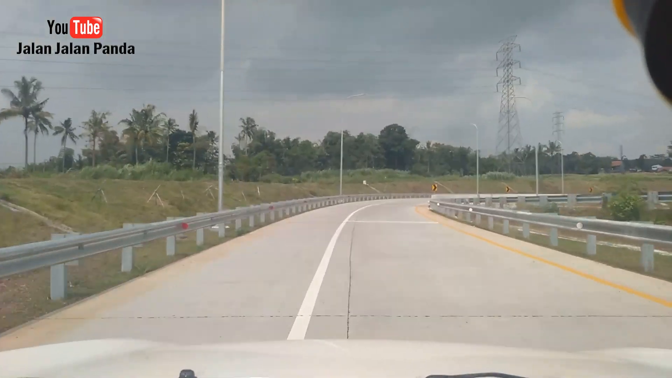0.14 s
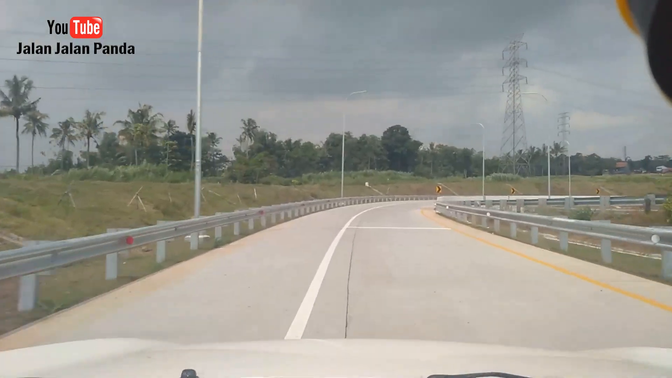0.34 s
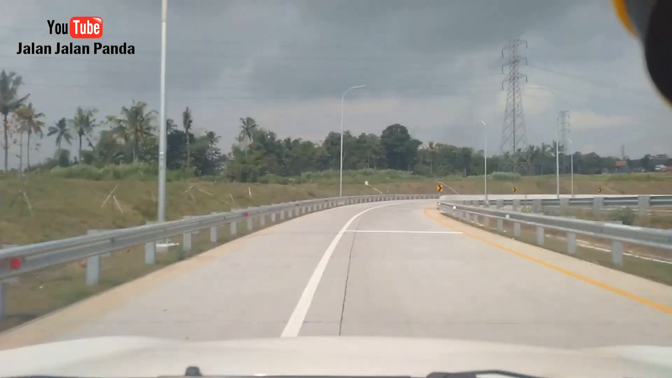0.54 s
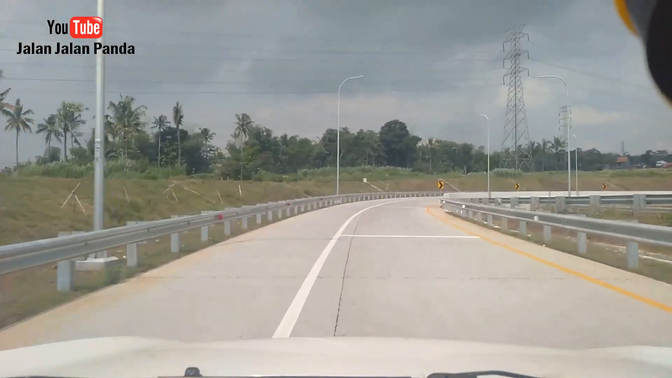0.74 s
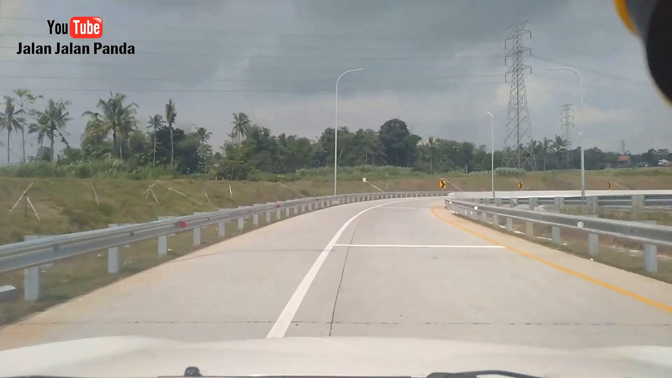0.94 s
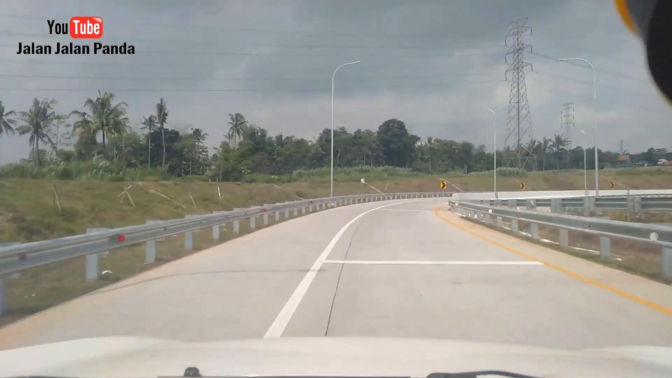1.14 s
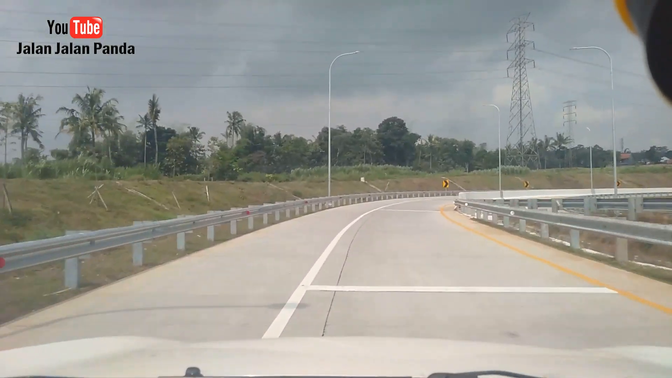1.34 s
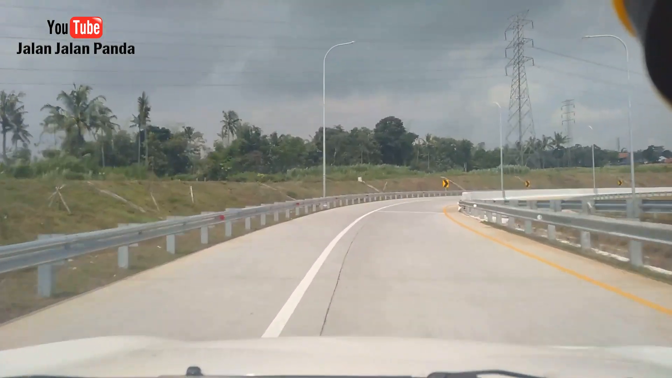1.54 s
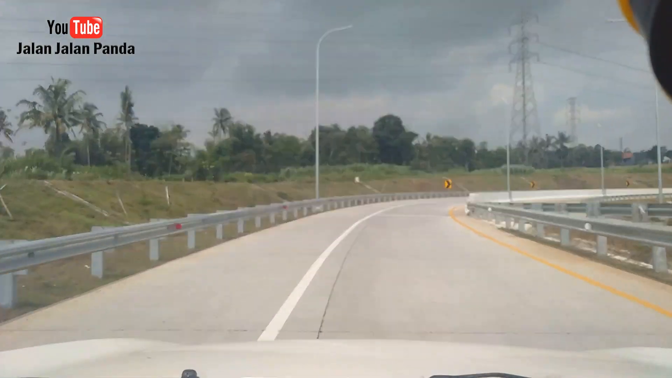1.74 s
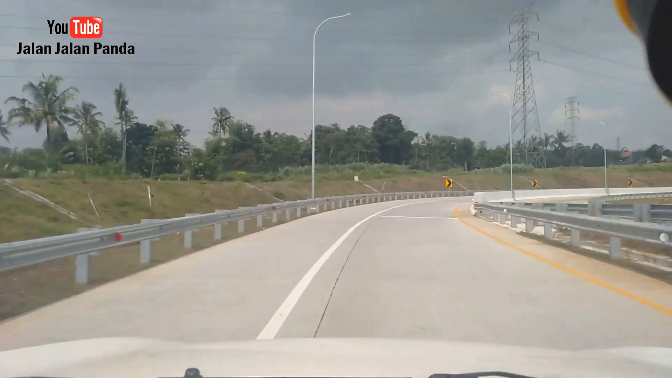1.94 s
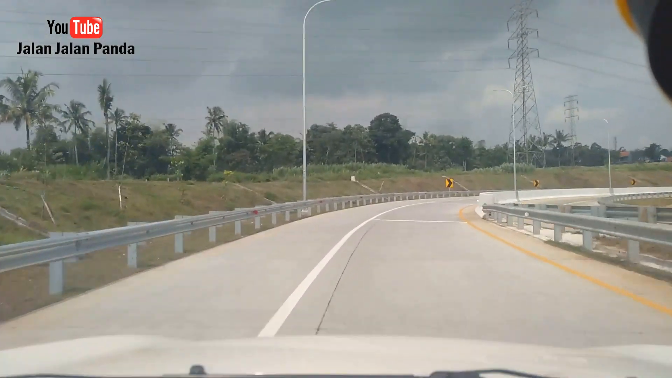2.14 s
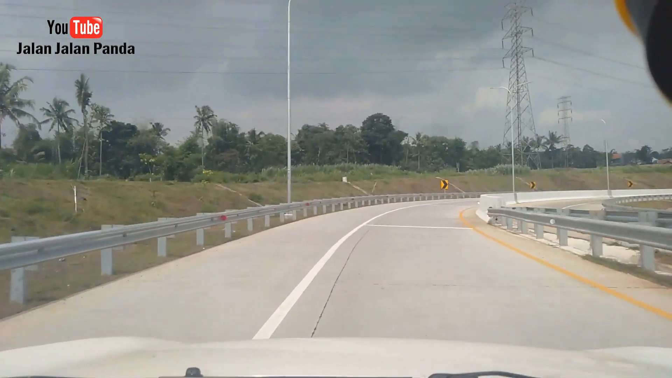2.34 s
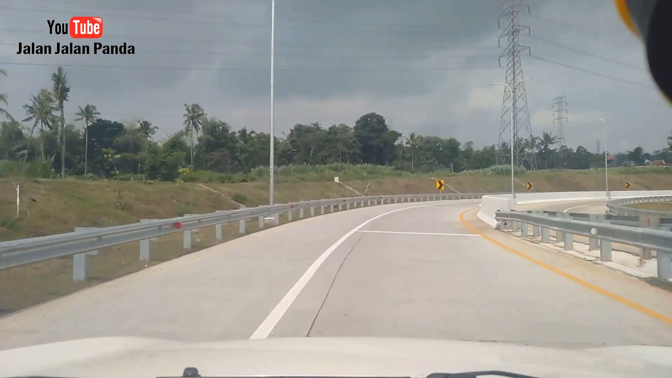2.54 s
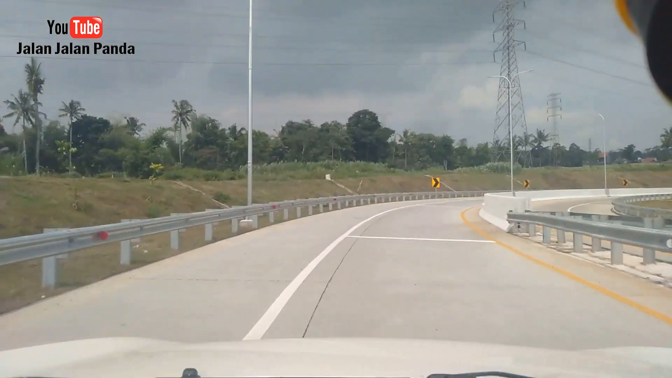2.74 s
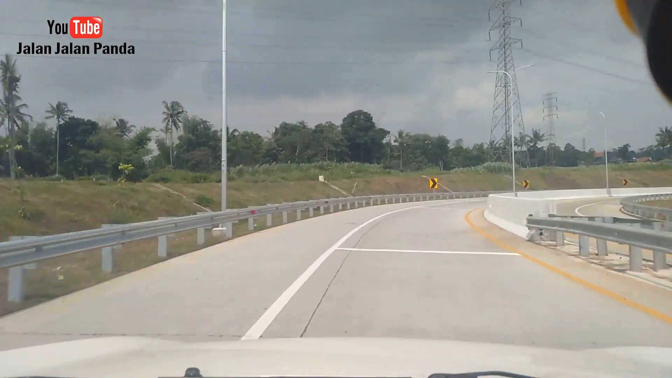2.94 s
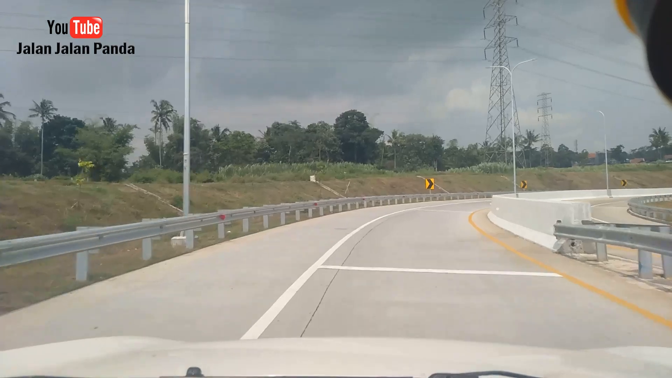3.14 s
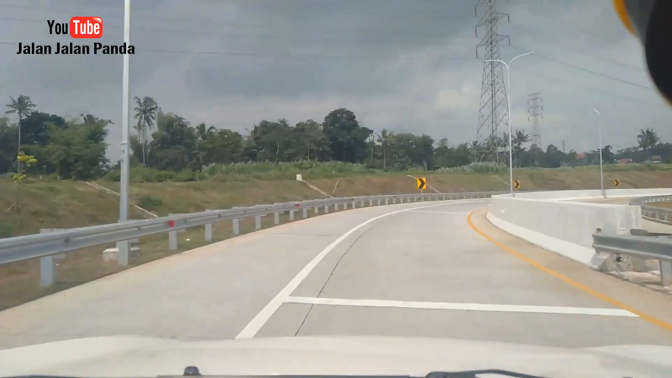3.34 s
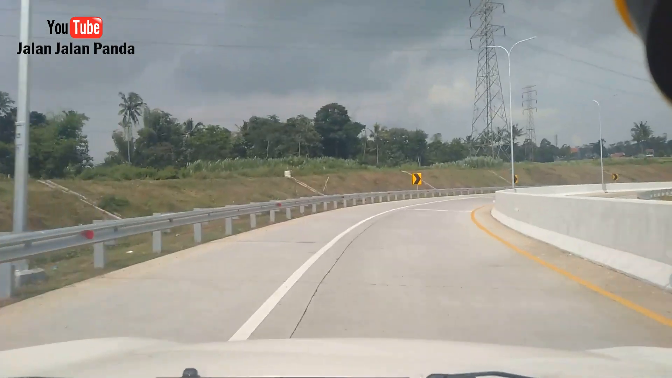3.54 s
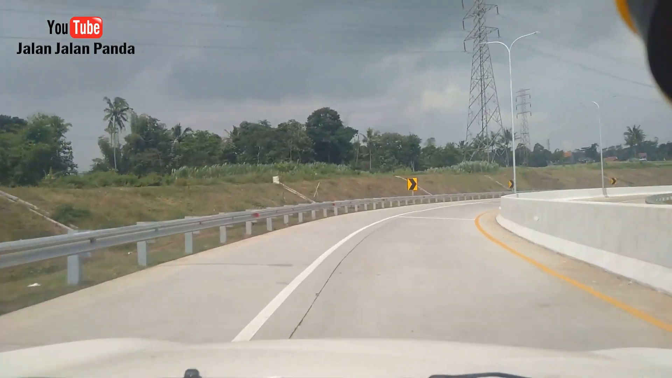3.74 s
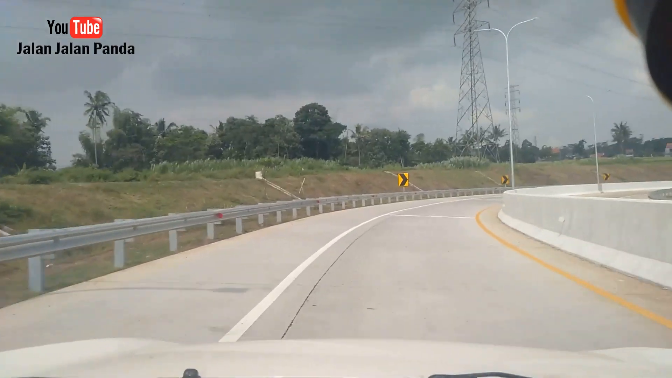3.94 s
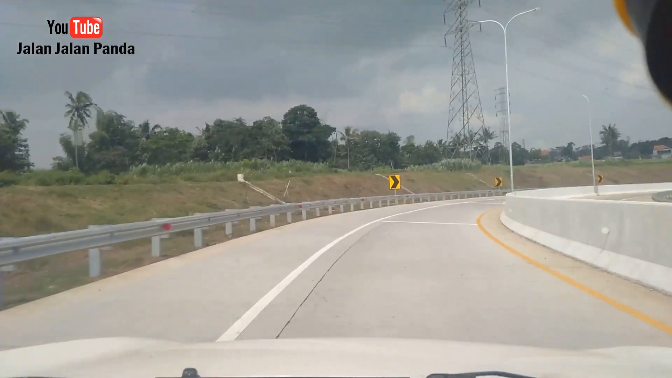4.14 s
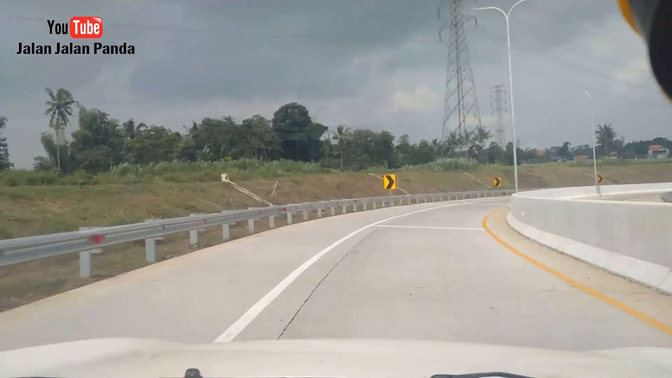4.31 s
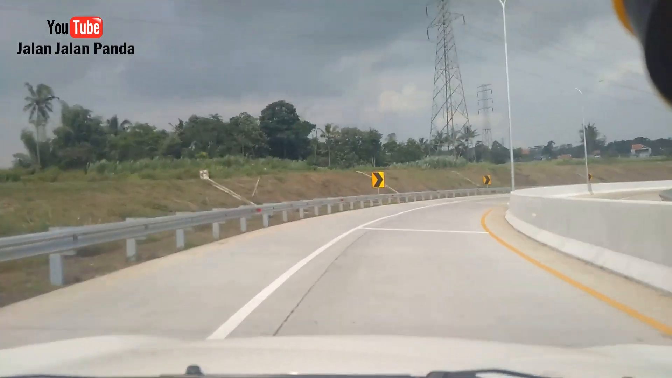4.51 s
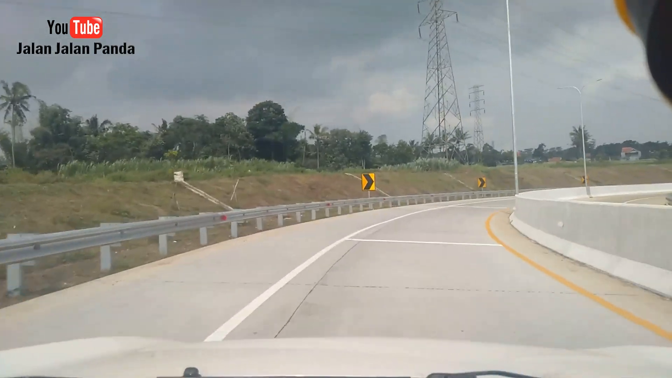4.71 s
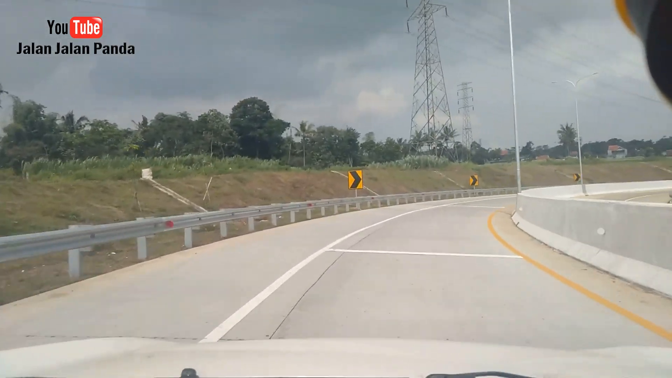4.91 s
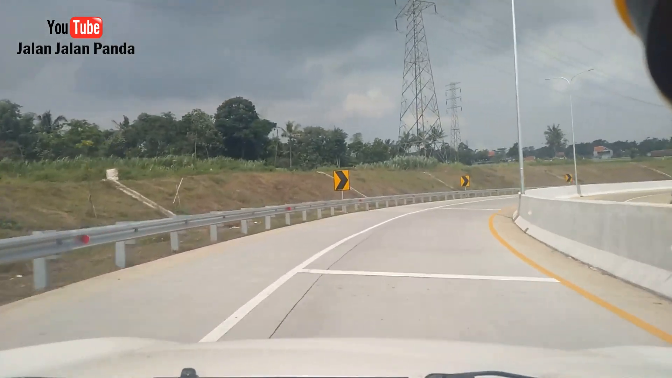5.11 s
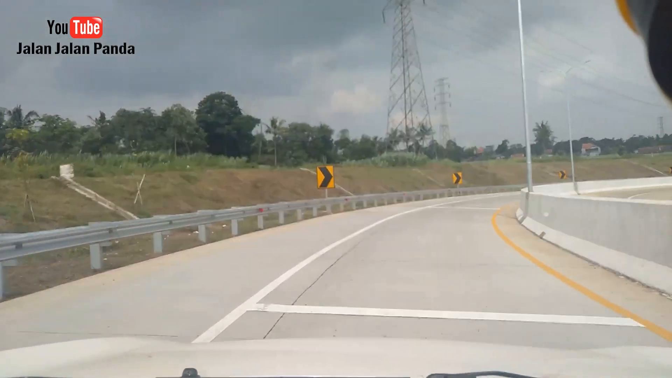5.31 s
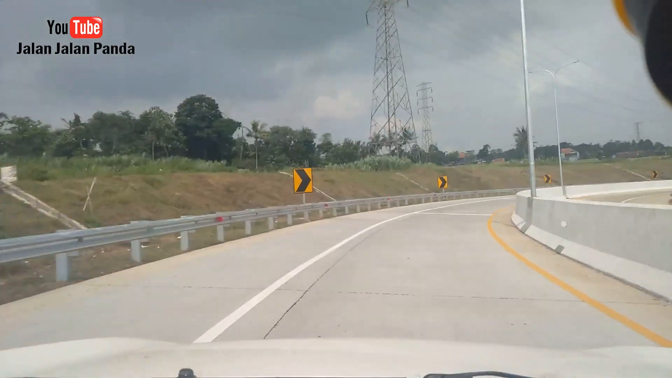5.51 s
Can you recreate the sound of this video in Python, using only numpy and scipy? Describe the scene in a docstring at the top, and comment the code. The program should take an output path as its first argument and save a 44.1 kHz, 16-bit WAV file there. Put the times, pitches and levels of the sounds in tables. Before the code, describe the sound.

Inside a moving car, steady low tyre rumble on concrete, broken about every two seconds by a double thump, slap and plastic rattle.

```python
"""Car on a concrete ramp

Cabin sound: tyre noise is filtered noise plus resonances, the engine a sine, the tread four beating sines.
About every two seconds a raised painted strip excites damped modes of the front axle, then of the rear.
Tread slaps are wobbling tones with noise; a loose panel lands with struck modes and a noise crack.
Trim chatter is a train of random impacts through panel and small-part responses; ticks are noise grains."""
import sys
import numpy as np
from scipy import signal
from scipy.fft import rfft, irfft, next_fast_len
from scipy.io import wavfile
from scipy.ndimage import uniform_filter1d

SR = 44100
rng = np.random.default_rng(int(sys.argv[2]) if len(sys.argv) > 2 else 0)


def generate_wav(signal):
    """Clip the signal to [-1, 1] and save it as 16-bit WAV at the path in sys.argv[1]."""
    frames = np.transpose(np.atleast_2d(signal))
    scaled = np.clip(frames, -1, 1) * 32767
    pcm = np.round(scaled).astype(np.int16)
    wavfile.write(sys.argv[1], SR, pcm)


N = 245637
T = np.arange(N) / SR  # time axis, s

# Spectral tables give relative levels: each shaped noise or response is normalised after filtering.
# Rolling noise in the body: [f/Hz, spectral level/dB]
ROAR_SPECTRUM = [(100, -2), (160, -0.5), (215, -7.5), (270, -4.5), (320, -11), (380, -7.5), (500, -8),
                 (610, -10.5), (740, -16.5), (890, -13.5), (1000, -21), (1180, -20.5), (1450, -26.5),
                 (2140, -27.5), (2900, -43), (3600, -44.5), (5000, -69)]
# Air hiss: [f/Hz, spectral level/dB]
AIR_SPECTRUM = [(3000, -3), (4500, -6), (6000, -11), (7500, -6), (9000, -4.5), (12000, -3.5), (14500, -3.5),
                (16000, -3.5)]
# Level of the air hiss: [t/s, level/dB]
HISS_LEVEL = [(0, -67), (.8, -70), (2.8, -73), (5.57, -71.5)]
# Coarseness of the concrete: [t/s, level/dB]
COARSENESS = [(0, 3), (.5, -0.5), (1.1, -2.1), (1.7, 2.5), (2.8, -2.5), (3.6, 0.5), (4.7, -0.05),
              (5.57, 2.2)]
# Resonances that the road keeps excited: [f/Hz, width/Hz, rms level/dB at zero coarseness]
BOOMS = [(27.3, 9.9, -26.5), (49.4, 17, -29.5), (72.4, 38, -41.5), (140.5, 26, -43.5), (202.5, 22.4, -51.5),
         (265.2, 22, -51), (472, 40, -58.5), (539, 36, -58), (651, 15, -59.5), (1060, 26, -67),
         (1148, 22, -66)]
ROAR_DB, ROAR_PER_COARSENESS = -42, 0.31  # level at zero coarseness, dB; dB per dB
SWELL_S, SWELL_DAMPING = .25, .6  # the dampers keep the rumble from building into long swells

# Speed of the car, setting tread note, engine note and axle delay: [t/s, speed/(m/s)]
SPEED = [(0, 13.0), (.35, 13.15), (.65, 12.9), (1.05, 13.1), (1.5, 12.9), (1.9, 13.0), (3.2, 13.0),
         (3.75, 13.25), (4.8, 13.15), (5.57, 12.95)]
ENGINE_CYCLES_PER_M, ENGINE_DB = 9.28, -42
# Pace of each tyre in the bend: [share of the car's speed]
TYRE_SPEEDS = [.995, .999, 1.001, 1.005]
TREAD_BLOCK_M, WHINE_DB = .0202, -54
WHINE_WAVER, WHINE_FLUTTER_DB = .008, 2  # spread of relative pitch; spread of level, dB

# Ticks of a small hard part: [t/s, level/dB]
TICKS = [(.109, -54.5), (.321, -62), (.996, -62), (1.274, -61), (1.481, -56), (1.634, -63), (1.900, -52.5),
         (3.830, -52), (3.846, -51), (4.044, -55)]
# Colour of a tick: [f/Hz, spectral level/dB]
TICK_SPECTRUM = [(3000, 4), (5600, -4), (7500, 7), (9500, -5), (15000, -10)]
TICK_RISE_S, TICK_T60_S = .001, .03

# Short rattles of shifting trim: [t/s, relative plastic level/dB, relative hard-part level/dB]
RATTLES = [(.168, -55, -64), (0.198, -48.5, -62), (.216, -54, -68), (0.262, -40, -74), (1.334, -48.5, -77),
           (1.699, -54, -79), (2.100, -56.5, -73), (2.127, -70, -74), (2.166, -67, -59),
           (2.205, -45, -57.5), (2.294, -47, -75), (2.426, -52, -69), (2.523, -51, -71),
           (3.948, -47.5, -73), (3.994, -48.5, -66), (4.026, -58, -78), (4.143, -73, -63),
           (4.234, -58, -76)]
# Response of the plastic panels: [f/Hz, spectral level/dB]
PLASTIC_SPECTRUM = [(300, 7.5), (600, 15), (1200, 6), (1700, 3), (2600, 1), (3400, -5), (5000, -10.5),
                    (6500, -7), (7600, -4.5), (9500, -19.5), (15500, -30)]
# Response of the small hard parts: [f/Hz, spectral level/dB]
HARD_SPECTRUM = [(2500, -22), (3400, -2.5), (5000, -14.5), (6500, -5.5), (7600, 2.5), (8500, -6),
                 (9700, -13), (12000, -12.5), (13500, -2.5), (15500, 0)]
# Ringing of the hard parts: [f/Hz, relative level/dB, t60/s]
HARD_MODES = [(2933, -38, .05), (3260, -37, .05), (3400, -37, .05), (3547, -36, .05), (4510, -37, .04),
              (7100, -38, .035), (7600, -36, .04), (8340, -37, .04), (13480, -32, .045), (15335, -34, .045)]
RATTLE_RISE_S, RATTLE_T60_S = 0.004, 0.083
BURST_DB, BURSTS_PER_S = 4, 70  # shaken trim chatters unevenly
PANEL_TICK_DB = -63.5  # relative shake
GRIT_PER_S, GRIT_SPREAD_DB = 1700, 4.5  # mean rate and size spread of the impacts
HARD_RING_DB, WASH_T60_S = -9, .042

# Strips met by the front axle: [t/s, front axle level/dB, rear axle level/dB, relative jingle level/dB,
# flight of the loose panel/s, reference level of its landing/dB]
STRIPS = [(-.060, -4, -2.5, -64, 0.037, -41), (1.885, 0.5, -1, -62.5, 0.069, -38),
          (3.815, 1, -2, -63, .064, -40)]
WHEELBASE_M, STRIP_WIDTH_M = 2.83, .4
# Modes set ringing by each axle: [f/Hz, relative level/dB, t60/s]
FRONT_MODES = [(24.05, 0, 0.8), (41.5, -8, 0.37), (56.5, -10.5, .22), (67, -25, 0.21), (119.6, -28, 0.13)]
REAR_MODES = [(28.03, -13, 0.77), (48, -5.5, 0.21), (56.85, -4, 0.39), (127.7, -13.5, 0.75)]
# Shudder of the body panels: [f/Hz, spectral level/dB]
PANEL_SPECTRUM = [(50, -23.5), (85, 6.5), (120, 5), (160, -3.5), (220, -6), (320, -16), (480, -21.5),
                  (800, -30), (1300, -35.5), (2200, -44.5), (4000, -76.5)]
# Further low thumps, ringing in the rear axle modes: [t/s, level/dB relative to the modes, contact/s]
LOW_THUMPS = [(0.212, -20, .007), (0.261, -23, .008), (2.205, -7, 0.016), (2.316, -14, 0.011),
              (4.099, -14, 0.0062), (4.182, -11, 0.018)]

# Modes of the loose panel: [f/Hz, relative level/dB, t60/s]
KNOCK_MODES = [(343, -1.5, 0.019), (590, 3, 0.038), (814, -4.5, 0.09), (894, -5.5, 0.074), (1185, 1, 0.027),
               (1605, -9, 0.048)]
# Crack along its edge: [f/Hz, spectral level/dB]
CRACK_SPECTRUM = [(1000, -0.5), (1570, 6.5), (2120, -9), (3480, 6), (5000, -14), (7600, -1), (9600, -14),
                  (15500, -3)]
KNOCK_DB, BOUNCE_S, BOUNCE_DB = 5, .019, -1  # knock re landing; bounce re knock
CRACK_DB, CRACK_RISE_S, CRACK_T60_S = -1, .009, .075  # level re landing

# Tread slaps on the strip edges, left and right a moment apart: [t/s, mean f/Hz, level/dB, t60/s]
SLAPS = [(.138, 520, -43, .12), (.154, 430, -31, 0.09), (0.164, 440, -30, 0.098), (.193, 340, -36, 0.14),
         (1.886, 570, -24.5, 0.11), (1.901, 517, -22, 0.042), (1.911, 400, -34, 0.098),
         (1.935, 515, -31, .16), (2.091, 431, -34, 0.13), (2.106, 450, -31.5, 0.079),
         (2.124, 482, -33.5, 0.082), (3.818, 400, -27.5, 0.082), (3.832, 440, -26.5, 0.051),
         (3.848, 470, -29, 0.057), (3.856, 540, -29.5, .09), (3.945, 450, -34, 0.09),
         (4.02, 400, -31, 0.092), (4.034, 436, -29, 0.091), (4.048, 450, -32, .17)]
SLAP_RISE_S, SLAP_WOBBLE = .003, 0.0401  # wobble: spread of relative pitch
SCUFF_DB, SCUFF_WIDTH_HZ = -10.5, 250

TOP_HZ = 15800  # upper band limit


def undb(db):
    """Decibel law: amplitude gain is 10^(level / 20)."""
    return 10 ** (np.asarray(db) / 20)


def unit(x):
    """Normalisation to unit root mean square."""
    return x / np.sqrt(np.mean(x ** 2) + 1e-20)


def walk(rate):
    """Slow random modulation: values held 1 / rate s, averaged twice; spread near 1."""
    k = int(SR / rate)
    held = np.repeat(rng.standard_normal(N // k + 2), k)
    return np.sqrt(2) * uniform_filter1d(uniform_filter1d(held, k), k)[:N]


def colour(x, points):
    """Minimum-phase filtering: folding the cepstrum makes the given response causal."""
    hz, db = np.transpose(points)
    size = 2 * next_fast_len(N)
    f = np.maximum(np.fft.rfftfreq(size, 1 / SR), 1)
    # beyond the end points the response falls 20 dB per octave
    skirts = np.minimum(np.log2(f / hz[0]), 0) + np.minimum(np.log2(hz[-1] / f), 0)
    response_db = np.interp(np.log(f), np.log(hz), db) + 20 * skirts
    cepstrum = irfft(np.log(undb(response_db)))
    cepstrum[1:size // 2] *= 2
    cepstrum[size // 2 + 1:] = 0
    return irfft(rfft(x, size) * np.exp(rfft(cepstrum)))[:N]


def band_noise(hz, width, damping=0):
    """Resonance selects a band of noise, rms 1; damping (0-1) evens out its swells."""
    f = np.maximum(np.fft.rfftfreq(N, 1 / SR), 1)
    detune = (f - hz ** 2 / f) / width
    x = irfft(rfft(rng.standard_normal(N)) / (1 + detune ** 2 / 2), N)
    if damping:
        power = uniform_filter1d(x ** 2, int(SWELL_S * SR)) + 1e-20
        x = x / power ** (damping / 2)
    return unit(x)


def fade(t, t60):
    """Exponential decay: the amplitude falls 60 dB in t60 from t = 0."""
    return np.exp(-np.log(1000) * np.maximum(t, 0) / t60)


def swell(start, rise, t60):
    """Transient envelope: a sine-squared rise, then exponential decay."""
    attack = np.sin(np.pi / 2 * np.clip((T - start) / rise, 0, 1)) ** 2
    return attack * fade(T - start - rise, t60)


def ring(modes, start):
    """Modal superposition: damped sines struck together."""
    t = np.maximum(T - start, 0)
    return sum(undb(db) * fade(t, t60) * np.sin(2 * np.pi * hz * t) for hz, db, t60 in modes)


def push(vibration, contact_s):
    """Finite contact time: a soft push is spread by convolution, which weakens high modes."""
    contact = signal.windows.hann(int(contact_s * SR))
    return signal.fftconvolve(vibration, contact / contact.sum(), "same")


def speed(s):
    """Kinematics: road speed in m/s, interpolated at time s."""
    return np.interp(s, *np.transpose(SPEED))


def rear_time(s):
    """Axle delay: the rear tyres arrive one wheelbase divided by speed later."""
    return s + WHEELBASE_M / speed(s)


def rolling():
    """Random excitation: road texture roars and keeps resonances going; air hisses faintly."""
    coarse_db = np.interp(T, *np.transpose(COARSENESS))
    roar_db = ROAR_DB + ROAR_PER_COARSENESS * coarse_db + 0.9 * walk(11)
    roar = unit(colour(rng.standard_normal(N), ROAR_SPECTRUM)) * undb(roar_db)
    booms = 0
    for hz, width, db in BOOMS:
        booms = booms + band_noise(hz, width, SWELL_DAMPING) * undb(db + 0.8 * walk(7))
    hiss_db = np.interp(T, *np.transpose(HISS_LEVEL)) + 0.4 * walk(11)
    air = unit(colour(rng.standard_normal(N), AIR_SPECTRUM)) * undb(hiss_db)
    return roar + booms * undb(coarse_db) + air


def engine():
    """Gearing: one soft engine order follows road speed, wavering in pitch and level."""
    frequency = ENGINE_CYCLES_PER_M * speed(T) * (1 + 0.01205 * walk(1.4))
    phase = np.cumsum(frequency) / SR
    return np.sqrt(2) * np.sin(2 * np.pi * phase) * undb(ENGINE_DB + walk(2.54))


def tread():
    """Beating: in the bend four tread-block notes differ slightly, so their sum wavers and breaks up."""
    out = 0
    for share in TYRE_SPEEDS:
        frequency = share * speed(T) / TREAD_BLOCK_M * (1 + WHINE_WAVER * walk(20))
        phase = rng.random() + np.cumsum(frequency) / SR
        out = out + np.sin(2 * np.pi * phase) * undb(WHINE_FLUTTER_DB * walk(12))
    return unit(out) * undb(WHINE_DB)


def ticks():
    """Brief impact: short decaying grains of coloured noise give dry ticks of a small hard part."""
    grain = unit(colour(rng.standard_normal(N), TICK_SPECTRUM))
    return grain * sum(undb(db) * swell(s, TICK_RISE_S, TICK_T60_S) for s, db in TICKS)


def shaking():
    """Forced vibration: how hard the plastic panels and small hard parts are shaken over time."""
    bursts = undb(BURST_DB * walk(BURSTS_PER_S))
    # the rough road keeps the panels ticking faintly
    plastic = undb(PANEL_TICK_DB + 2 * walk(35))
    hard = 0
    for s, _, rear_db, jingle_db, flight, landing_db in STRIPS:
        # the front axle shakes the dashboard, and the panel it threw comes down with a crash
        front = bursts * swell(s + 0.011, rise=0.041, t60=0.38)
        crash = swell(s + flight, rise=0.0062, t60=0.11)
        plastic = plastic + undb(landing_db) * (crash + undb(-10.5) * front)
        hard = hard + undb(landing_db - 2.0) * (crash + undb(-17.5) * front)
        # the rear axle is farther off: duller chatter, and a jingle that builds late
        rear = rear_time(s)
        rear_chatter = bursts * swell(rear + 0.0063, rise=0.012, t60=1.0)
        jingle = bursts * swell(rear + 0.03, rise=0.11, t60=0.29)
        plastic = plastic + undb(rear_db - 55.5) * rear_chatter
        hard = hard + undb(jingle_db) * jingle
    for s, plastic_db, hard_db in RATTLES:
        rattle = swell(s, RATTLE_RISE_S, RATTLE_T60_S)
        plastic = plastic + undb(plastic_db) * rattle
        hard = hard + undb(hard_db) * rattle
    return plastic, hard


def chatter(shake, scatter_db, scatter_t60):
    """Random impacts and diffusion: uneven tiny blows, each with a short wash from the cabin."""
    size_db = GRIT_SPREAD_DB * np.clip(rng.standard_normal(N), -2, 2)
    sizes = rng.choice([-1, 1], N) * undb(size_db)
    struck = rng.random(N) < GRIT_PER_S / SR
    impacts = shake * unit(struck * sizes)
    # the wash follows the energy of the impacts
    tail = fade(T[:SR // 4], scatter_t60) ** 2
    wash = np.sqrt(np.abs(signal.fftconvolve(impacts ** 2, tail / tail.sum())[:N]))
    return undb(-8.0) * impacts + undb(scatter_db) * wash * rng.standard_normal(N)


def trim():
    """Impulse response: jolts make plastic chatter dully; small hard parts jingle at their own levels."""
    click = signal.unit_impulse(N)
    plastic_response = colour(click, PLASTIC_SPECTRUM)
    hard_response = colour(click + ring(HARD_MODES, 0) * undb(HARD_RING_DB), HARD_SPECTRUM)
    out = 0
    for shake, response in zip(shaking(), (plastic_response, hard_response)):
        impacts = chatter(shake, scatter_db=-4.0, scatter_t60=WASH_T60_S)
        out = out + signal.fftconvolve(impacts, response / np.linalg.norm(response))[:N]
    return undb(4.0) * out


def low_thumps():
    """Contact duration: more soft pushes renew the low rear thump; a shorter contact sounds harder."""
    return sum(undb(db) * push(ring(REAR_MODES, s), contact_s) for s, db, contact_s in LOW_THUMPS)


def knocks():
    """Impact and rebound: the loose panel hits the dashboard with a knock and bright crack, and bounces."""
    crack = unit(colour(rng.standard_normal(N), CRACK_SPECTRUM))
    out = 0
    for s, *_, flight, landing_db in STRIPS:
        lands = s + flight
        body = ring(KNOCK_MODES, lands) + undb(BOUNCE_DB) * ring(KNOCK_MODES, lands + BOUNCE_S)
        edge = crack * swell(lands, CRACK_RISE_S, CRACK_T60_S)
        out = out + undb(landing_db) * (undb(KNOCK_DB) * body + undb(CRACK_DB) * edge)
    return out


def slaps():
    """Frequency modulation: slapped tread rings hollow, shifting as it deforms, over a rubber scuff."""
    out = 0
    for s, hz, db, t60 in SLAPS:
        phase = np.cumsum(hz * (1 + SLAP_WOBBLE * walk(200))) / SR
        hollow = np.sin(2 * np.pi * phase)
        scuff = undb(SCUFF_DB) * band_noise(hz, SCUFF_WIDTH_HZ)
        out = out + undb(db) * (hollow + scuff) * swell(s, SLAP_RISE_S, t60)
    return out


def axle(crossings, modes, patch_m, climb_db, drop_db, shudder_db, shudder_rise, shudder_t60):
    """Modal excitation: tyres push the body climbing on and dropping off, and the panels shudder."""
    out = np.zeros(N)
    panels = unit(colour(rng.standard_normal(N), PANEL_SPECTRUM))
    for s, db in crossings:
        # the tyre leaves after the strip's width plus its own contact patch
        drop = s + (STRIP_WIDTH_M + patch_m) / speed(s)
        pushes = undb(climb_db) * ring(modes, s) + undb(drop_db) * ring(modes, drop)
        thump = push(pushes, contact_s=0.008)  # soft rubber
        shudder = panels * swell(s - .01, shudder_rise, shudder_t60)
        out += undb(db) * (thump + undb(shudder_db) * shudder)
    return out


def scene():
    """Linear superposition of all sources, as heard from the dashboard."""
    background = rolling() + engine() + tread()
    front = axle([(s, db) for s, db, *_ in STRIPS], FRONT_MODES, patch_m=0.2,
                 climb_db=-15, drop_db=-6, shudder_db=-23.0, shudder_rise=0.057, shudder_t60=1.0)
    rear = axle([(rear_time(s), db) for s, _, db, *_ in STRIPS], REAR_MODES, patch_m=0.073,
                climb_db=-6.0, drop_db=-3.5, shudder_db=-22.5, shudder_rise=0.043, shudder_t60=0.63)
    loose_parts = ticks() + trim() + knocks()
    return (background + loose_parts + low_thumps() + slaps() + front + rear)[None]


def record(dry):
    """Band limitation: the microphone loses the deepest sway and the recorder cuts the top."""
    sound = signal.sosfilt(signal.butter(1, 8, "high", fs=SR, output="sos"), dry)
    return signal.sosfilt(signal.ellip(10, .2, 80, TOP_HZ, fs=SR, output="sos"), sound)


dry = scene()
out = record(dry)
generate_wav(out)
```